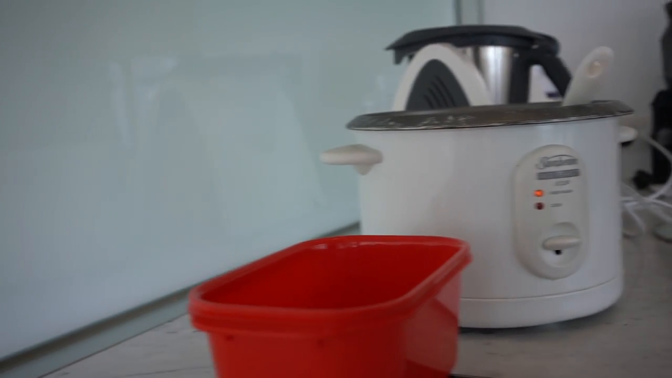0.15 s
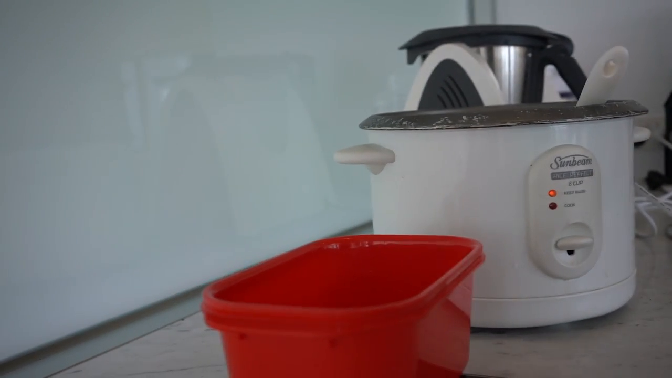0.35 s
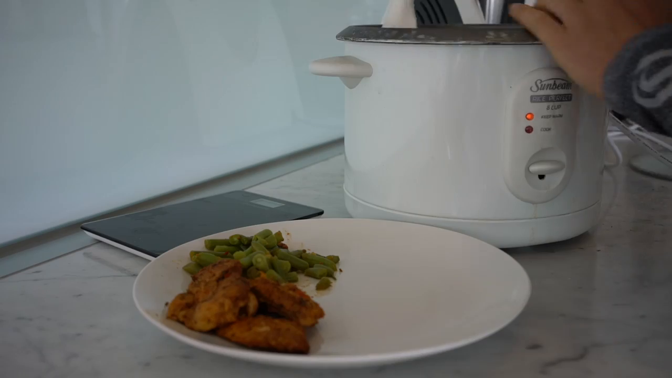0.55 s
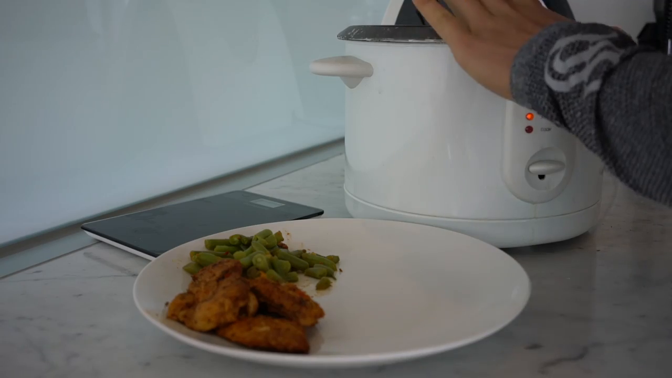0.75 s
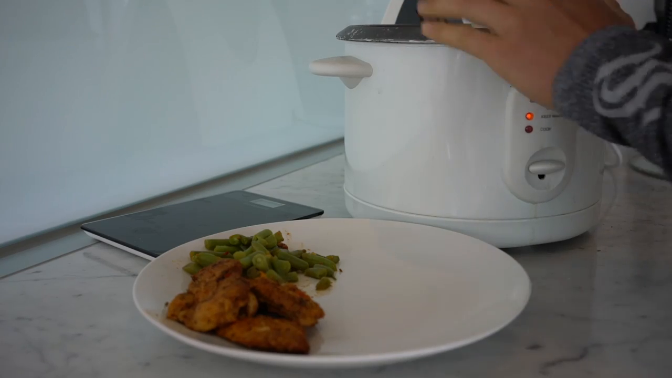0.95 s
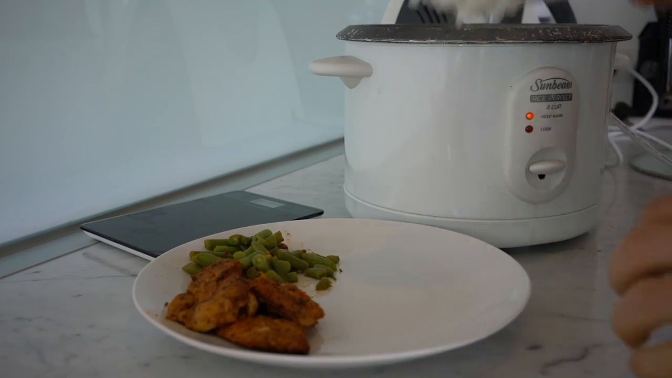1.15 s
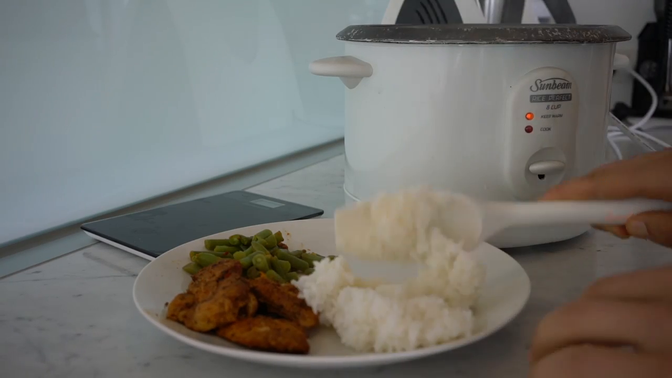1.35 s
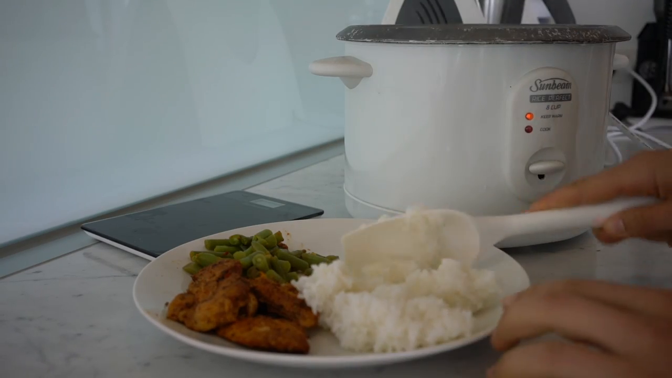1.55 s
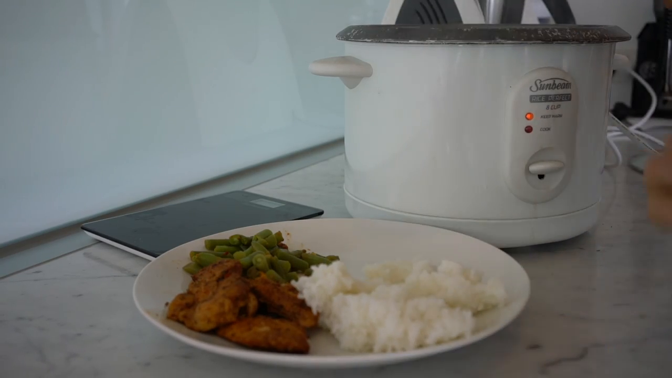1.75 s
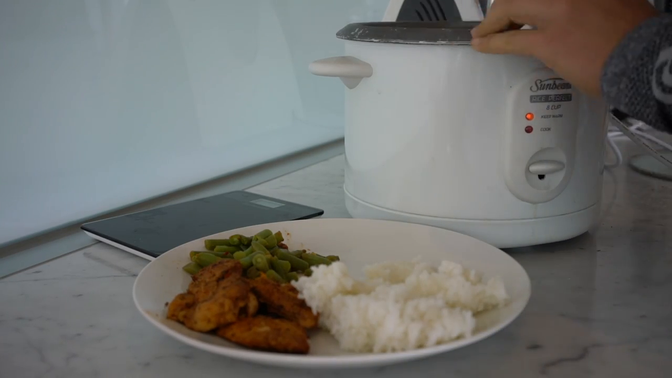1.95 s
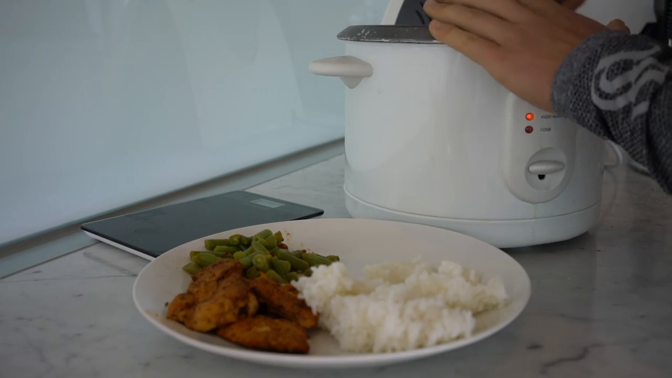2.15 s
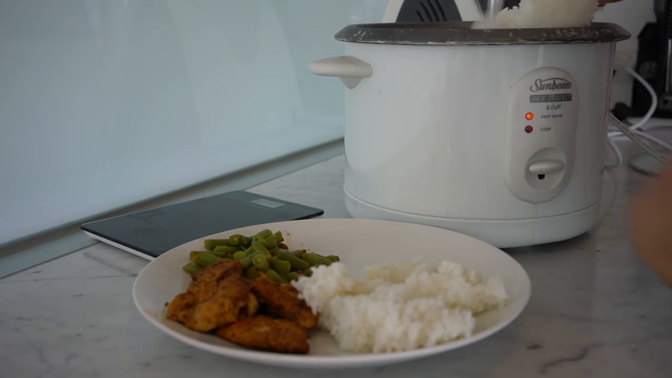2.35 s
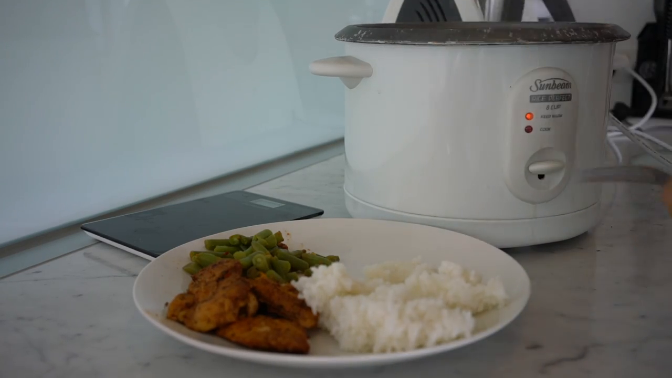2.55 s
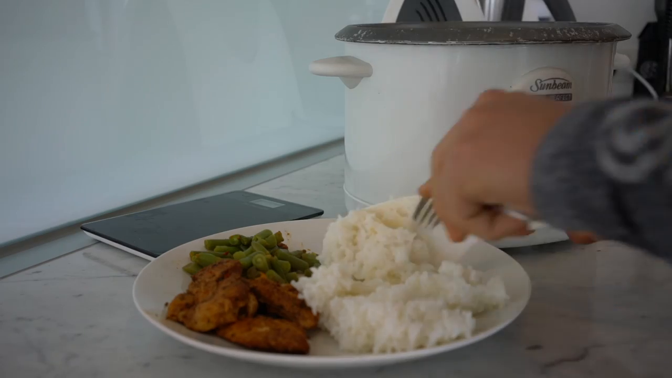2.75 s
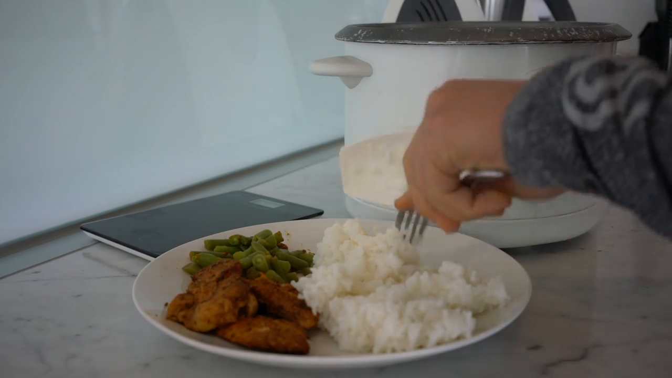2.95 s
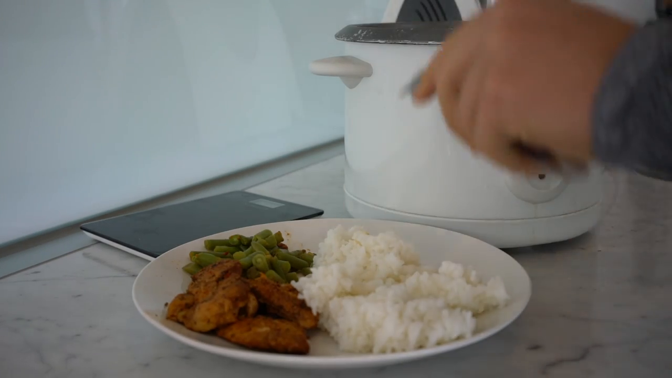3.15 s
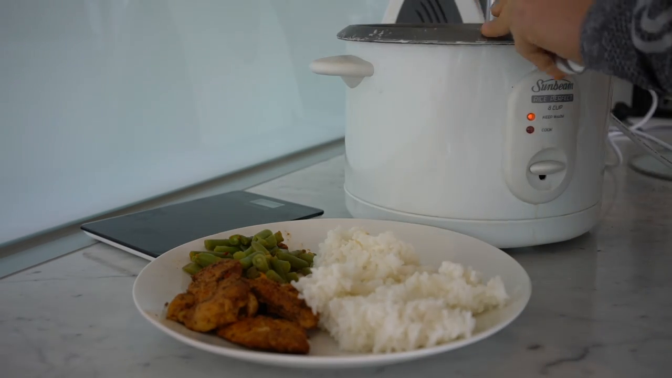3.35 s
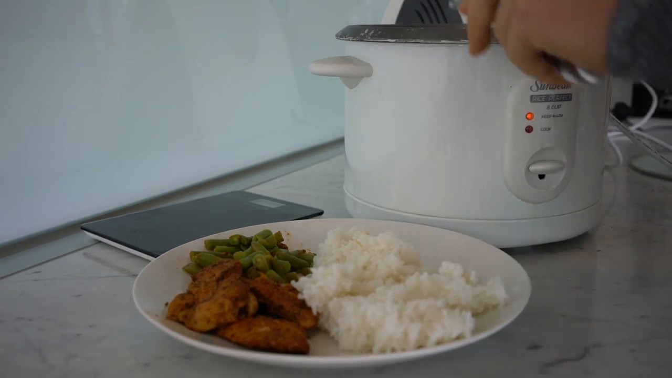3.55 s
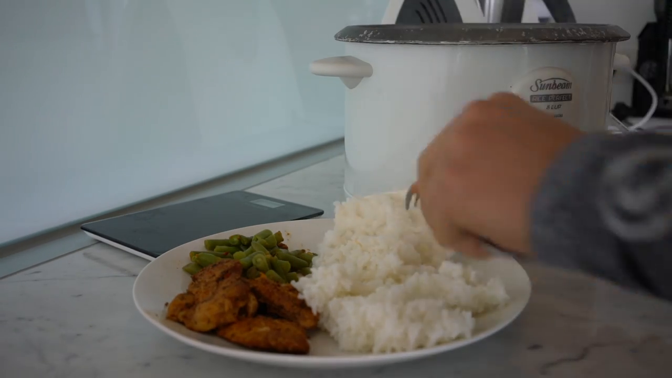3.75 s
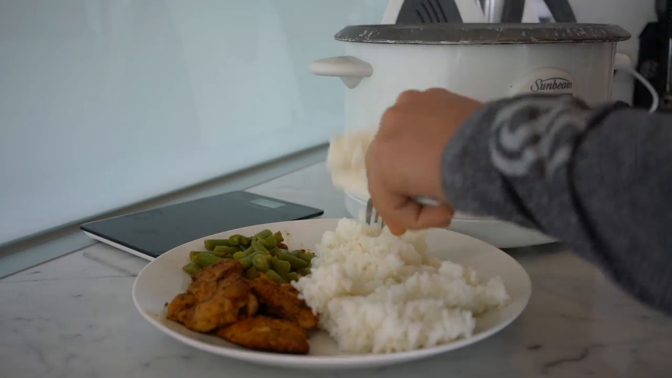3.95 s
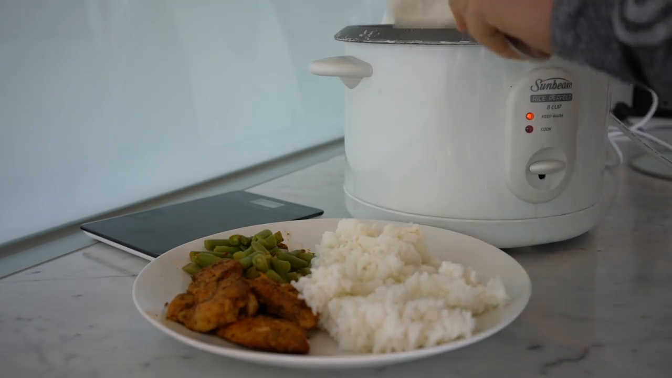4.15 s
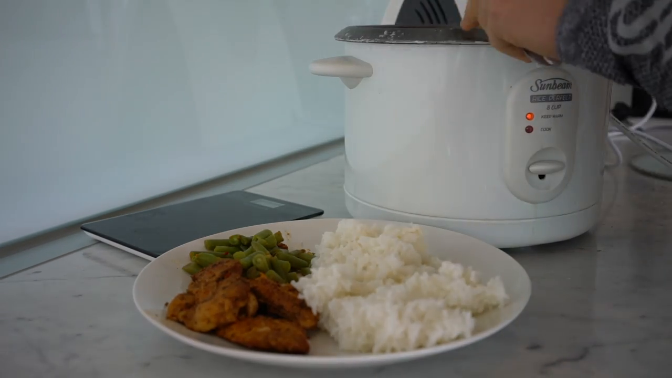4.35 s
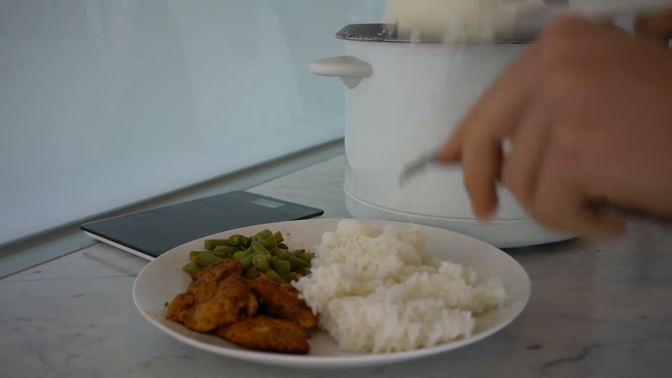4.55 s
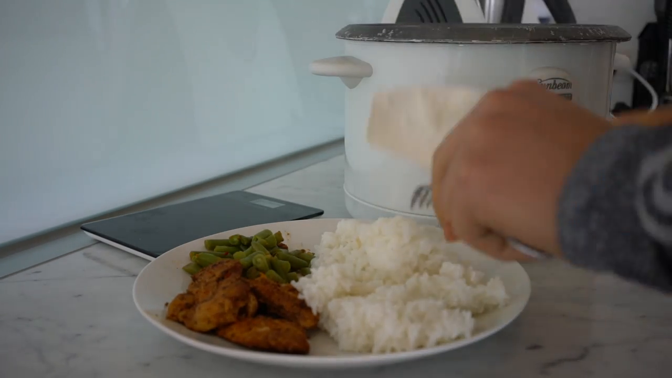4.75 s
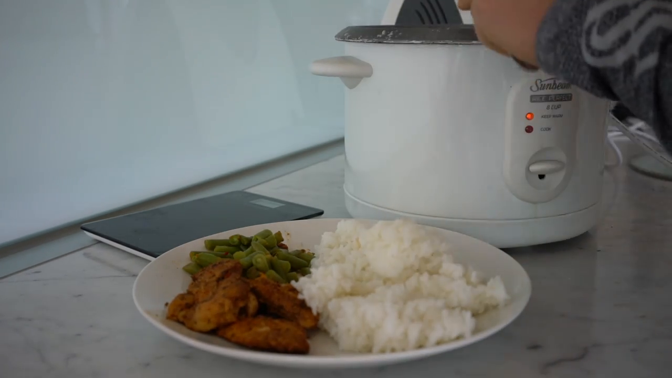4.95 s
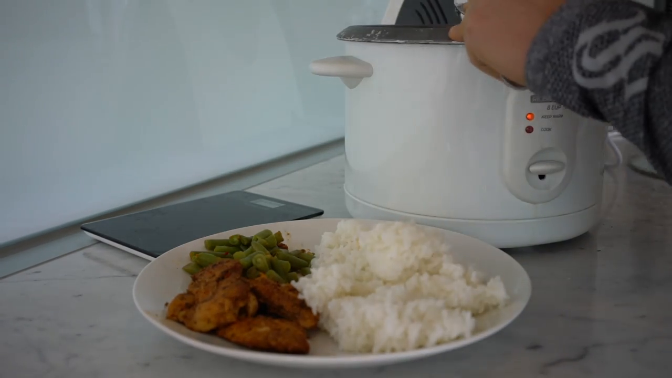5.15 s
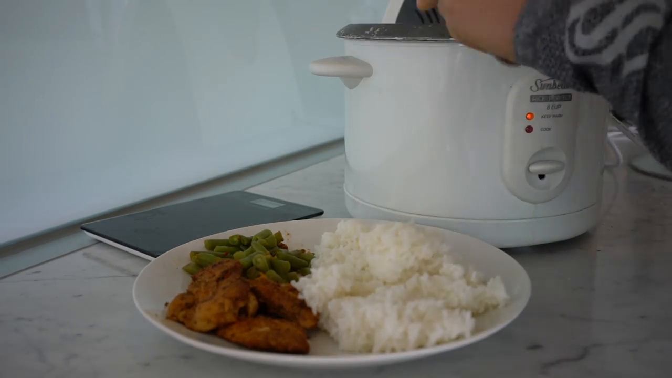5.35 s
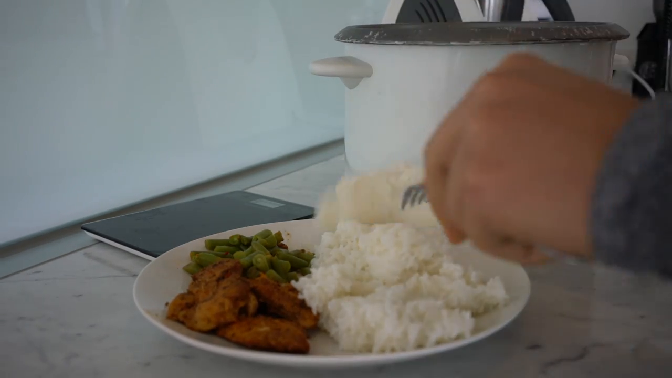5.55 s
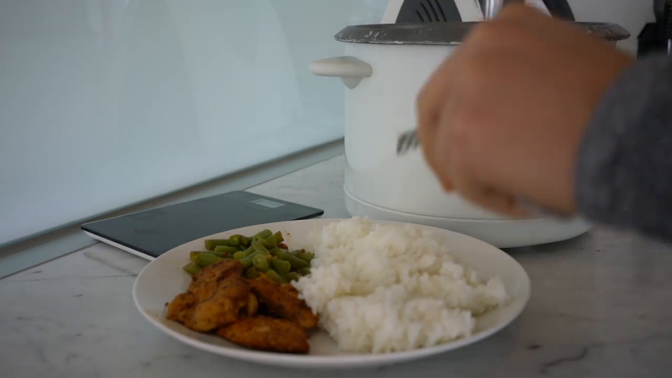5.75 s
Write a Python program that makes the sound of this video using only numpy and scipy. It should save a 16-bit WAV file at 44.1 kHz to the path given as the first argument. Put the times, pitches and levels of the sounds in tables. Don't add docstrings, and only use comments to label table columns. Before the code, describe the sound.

Low handling rumble and rattle cut off, then a spoon digs rice from a metal cooker pot with dull knocks, scrapes and plate taps.

```python
import sys
import numpy as np
from scipy import signal
from scipy.fft import rfft, irfft, next_fast_len
from scipy.io import wavfile
from scipy.ndimage import uniform_filter1d, map_coordinates

SR = 44100
rng = np.random.default_rng(int(sys.argv[2]) if len(sys.argv) > 2 else 0)


def convert_level_to_amplitude(level_db):
    exponent = np.asarray(level_db, float) / 20
    return 10 ** exponent


def materialize(psi):
    bounded = np.clip(np.atleast_2d(psi).T, -1, 1)
    quanta = np.round(bounded * 32767).astype(np.int16)
    wavfile.write(sys.argv[1], SR, quanta)


N = 255969

# time in seconds, sway frequency in Hz, sway peak in dB.
SWAY = [
    (0, 8, -16),
    (.06, 19, -17),
    (.135, 22, -13),
    (.2, 19, -20),
    (.3, 16.5, -27),
    (.39, 17, -23),
    (.45, 19, -38),
    (.51, 25, -11),
    (.585, 22, -30),
]
# frequency in Hz, level in dB per Hz.
RATTLE_SPECTRUM = [(32, -58), (55, -11), (92, -1), (135, -16), (212, -11), (258, -56), (300, -20.5),
                   (390, -52), (660, -120)]
# frequency in Hz, width in Hz, level in dB.
CABINET_MODES = [
    (505, 81, -1.5),
    (640, 83, -3),
    (800, 34, -5),
    (1460, 720, -9),
]
# time in seconds, rustle level in dB, brightness in dB.
STIR = [(0, -55.5, 3.5), (.58, -49.5, -5), (.6, -41.5, -13), (.94, -46, -2), (1.08, -40, 6),
        (1.4, -40.5, 3), (1.72, -46.5, 4.5), (2.29, -43.5, 2), (2.55, -39.5, 0.5), (3.05, -50, 5.5),
        (3.58, -48, -4), (3.66, -45.5, 6), (4.2, -51, 5.5), (4.52, -55.5, 0.5), (4.68, -50, 1),
        (4.84, -55.5, 3), (5.58, -52, 3.5), (5.8, -56.5, -1)]
# time in seconds, rumble level in dB.
LEAN = [(.6, -47), (.75, -37), (.93, -51), (1.3, -46), (1.45, -44), (1.74, -48), (1.85, -41.5), (2.37, -52),
        (2.9, -50), (3.16, -44.5), (3.4, -46.5), (4, -48.5), (4.12, -45), (4.32, -38), (4.45, -51),
        (4.72, -46), (5.18, -41), (5.4, -53)]
# frequency in Hz, level in dB per Hz.
RUMBLE_SPECTRUM = [(8.8, -36), (15, 0.5), (48, 6), (64, -3), (81, -7), (200, -12.5), (260, -15.5),
                   (440, -120)]
HUM_SPECTRUM = [(88, -10), (150, -2.5), (218, -9), (257, -9), (284, -10.5), (552, -10), (1020, -12.5),
                (1710, -16.5), (3000, -25.5), (3900, -27), (6600, -120)]
RUSTLE_SPECTRUM = [(410, -21), (700, 8), (956, -4.5), (1190, 9), (1360, -1), (1780, 8.5), (1900, 5.5),
                   (2660, 7), (9200, 0.5), (10000, -4.5), (13700, -6.5), (15600, -11.5)]
# start in seconds, peak in dB, pitch in Hz, t60 in seconds.
JIGGLES = [
    (0.016, -37, 204, 0.074),
    (0.074, -41, 1700, .1),
    (.28, -38, 610, 0.052),
    (.35, -38, 800, .09),
    (.42, -37.5, 221, 0.093),
    (.53, -32, 211, .12),
]
# start in seconds, peak in dB, pitch in Hz.
GLINTS = [(.5869, -36, 11000), (1.2245, -28, 11000), (1.2335, -31, 11000), (1.28, -39, 10000),
          (1.327, -32, 9000), (1.43, -36, 13000), (1.631, -23, 12500), (1.6769, -22, 12500),
          (1.9483, -21, 11000), (2.0735, -30, 11000), (2.8517, -32, 12000), (2.861, -31, 11000),
          (3.0702, -31, 11500), (3.1126, -31, 12000), (3.2503, -40, 12000), (3.259, -39, 12000),
          (3.3376, -39, 11000), (3.3516, -39, 11000), (3.4883, -42, 11000), (3.614, -35, 11000),
          (4.277, -43, 11000), (4.4521, -49, 11000), (4.7195, -38, 9000), (4.805, -47, 11000),
          (4.511, -44, 11500), (4.595, -44, 14000), (4.714, -32, 6500), (4.729, -41, 9000),
          (4.8562, -41, 12000), (5.0133, -31, 11000), (5.0198, -32, 11000), (5.1171, -23, 9000),
          (5.1919, -36.5, 11000), (5.3096, -33, 8900), (5.415, -42, 9000), (5.6469, -46, 13000),
          (5.743, -38, 8200), (5.7511, -40, 13500)]
# start in seconds, peak in dB, pitch in Hz.
SNAPS = [(0.5878, -36, 2500), (1.2545, -25, 2200), (1.316, -27, 8700), (1.403, -31, 7000),
         (1.3264, -38, 2720), (1.629, -28.5, 4050), (1.6773, -45, 2680), (1.6944, -34, 4260),
         (2.763, -27.5, 5040), (2.8538, -33, 4390), (2.8616, -35, 2690), (2.9224, -35, 3210),
         (2.9746, -38, 8620), (3.0126, -34.5, 2930), (3.0696, -35, 8800), (3.112, -36, 3780),
         (3.253, -35, 8440), (3.2585, -35.5, 2600), (3.6144, -29, 2730), (3.8347, -33, 8600),
         (3.861, -30, 4700), (3.927, -34, 3470), (4.276, -29, 2840), (4.773, -46, 3710),
         (4.8054, -53, 6010), (4.858, -35, 8500), (4.8784, -34, 5530), (5.1178, -31, 2800),
         (5.3093, -33.5, 8500), (5.4864, -52, 2720)]
# frequency in Hz, width in Hz, level in dB.
POT_MODES = [(126, 125, -8), (250, 141, -1.5), (307, 36, 3.5), (350, 70, -2.5), (460, 23, 1.5),
             (679, 202, -3.5), (770, 120, -1), (955.6, 36, -10.5), (1145, 107, -8.5), (1672, 93, -12.5),
             (2006, 210, -14.5), (2600, 3600, -34)]
EDGE_MODES = [(2880, 1460, -4), (4220, 21, 4), (4230, 1100, -8.5), (8600, 2000, -2), (13000, 2300, -7)]
# start in seconds, peak in dB, favoured pitch in Hz.
RAPS = [(.722, -14, 274), (.788, -19.5, 345), (.829, -24.5, 316), (.876, -19, 690), (.898, -19.5, 920),
        (1.251, -31.5, 1210), (1.999, -12.5, 330), (2.409, -34, 278), (2.513, -26.5, 1366),
        (3.511, -18.5, 1756), (2.042, -21, 1770), (4.451, -17.5, 610), (1.06, -27, 1800)]
KNOCKS = [(.993, -30.5, 550), (1.056, -34, 573), (1.93, -26, 770), (1.967, -9.5, 280), (2.037, -15, 590),
          (2.183, -25, 295), (2.362, -14, 276), (2.374, -23, 400), (2.395, -35, 274), (2.57, -29, 456),
          (3.321, -21, 325), (3.338, -10.5, 300), (3.41, -13.5, 640), (3.644, -19.5, 228),
          (4.277, -11, 282), (4.291, -12, 455), (4.314, -13, 343), (4.377, -20.5, 383), (4.396, -20.5, 344),
          (4.444, -13.5, 440), (4.488, -38, 307), (5.037, -15.5, 287), (5.089, -17, 435), (5.117, -15, 604),
          (5.188, -14, 395), (5.367, -19.5, 477), (2.328, -30, 600), (5.004, -25, 405), (3.455, -30, 310),
          (3.555, -33, 470)]
NUDGES = [(.733, -17.5, 404), (1.942, -12, 542), (2.071, -16, 620), (2.261, -27, 665), (2.309, -30, 477),
          (2.339, -15.5, 624), (3.432, -20, 313), (3.544, -19, 510), (3.619, -14.5, 329), (5.016, -13, 430),
          (5.223, -33, 262), (5.301, -27.5, 485), (5.447, -34.5, 503), (5.484, -31.5, 685),
          (5.495, -33, 297), (5.32, -34, 620)]
DRAGS = [(.616, -17.5, 345), (.66, -24, 390), (.69, -22.5, 514), (.81, -25, 497), (1.984, -14, 348),
         (2.081, -11, 400), (2.109, -16, 250), (2.149, -21, 450), (3.352, -14, 310), (3.487, -20, 384),
         (3.606, -20, 470), (4.359, -25.5, 307), (5.01, -18.5, 250), (5.06, -20.5, 250), (5.133, -18, 279),
         (5.389, -30, 450), (5.235, -29.5, 394)]
# start in seconds, peak in dB, favoured pitch in Hz.
BLOWS = [(.6195, -27, 336), (.7225, -19.5, 298), (.7365, -21, 423), (0.788, -25, 334), (1.0619, -22, 630),
         (1.9455, -14.5, 505), (1.973, -12, 330), (1.981, -13, 312), (2.0855, -15, 365), (2.1025, -14, 400),
         (2.116, -13.5, 300), (2.345, -21, 665), (2.3635, -20, 294), (3.336, -9.5, 320), (3.37, -14.5, 302),
         (3.4875, -17.5, 404), (3.6185, -16, 408), (4.2955, -8, 350), (4.3065, -14, 332),
         (4.4545, -14.5, 560), (5.0205, -20, 348), (5.0295, -13.5, 340), (5.043, -16, 480),
         (5.0935, -11, 476), (5.132, -11, 390), (5.139, -11, 270), (5.1915, -18, 436), (5.303, -24.5, 460),
         (5.372, -28, 474), (5.38, -23, 450), (5.446, -32, 463), (3.432, -21.5, 310), (3.352, -11, 292),
         (5.4885, -26, 290)]
# start in seconds, peak in dB.
FLICKS = [(.6286, -33), (.6746, -19), (.699, -17), (.7187, -18), (.7879, -16.5), (.8794, -17),
          (1.946, -20.5), (1.9594, -14.5), (2.0994, -20), (2.2308, -28), (3.3497, -18), (3.5056, -33),
          (3.6494, -43), (1.222, -26.5), (4.4492, -31), (4.7282, -29), (4.8234, -58), (5.043, -24.5),
          (5.1164, -20.5), (5.1893, -21.5)]
SWEEPS = [(.61, -35), (.6507, -25), (.69, -32), (.89, -34), (.76, -18), (.735, -26.5), (.8183, -20),
          (.8508, -19.5), (2.0765, -21.5), (2.1872, -27), (3.3357, -21.5), (3.3697, -24.5), (3.491, -33.5),
          (3.6127, -28.5), (4.1919, -33.5), (4.2768, -26.5), (4.3075, -26.5), (4.7156, -41), (5.019, -20.5),
          (5.135, -28.5), (5.6384, -40.5)]
# start in seconds, peak in dB, brightness in dB, singing pitch in Hz, t60 in seconds.
SQUEAKS = [(1.578, -30, -33, 4060, 0.02), (0.899, -19.5, -40, 3190, 0.039),
           (1.989, -22.5, -22, 4040, 0.097), (2.0025, -14.5, -19, 4220, 0.013),
           (2.0405, -22, -16.5, 4220, 0.024), (2.1195, -26.5, -30, 2960, 0.066),
           (2.5137, -27.5, -45, 5260, 0.06), (2.7567, -30.5, -10, 4100, 0.066),
           (3.4095, -17.5, -17, 4120, 0.059), (3.5427, -36, -19, 4930, 0.046),
           (3.901, -30, -14.5, 3320, 0.051), (4.36, -23, -35, 4220, 0.052),
           (4.373, -27.5, -22, 4260, 0.018), (4.391, -39, -15, 2850, 0.074), (5.088, -36, -18, 2520, 0.099)]
# start in seconds, peak in dB, thud pitch in Hz, ring level in dB, favoured mode in Hz.
TAPS = [
    (1.492, -27, 158, -12, 1575),
    (1.5347, -16, 129, -7.5, 1575),
    (1.546, -20, 101, -7, 1575),
    (1.5733, -38.5, 150, 8, 2320),
    (1.5806, -17, 158, -11, 4250),
    (1.589, -17.5, 113, -15, 855),
    (1.6257, -16, 148, -10.5, 1200),
    (1.67, -13, 118.5, -16.5, 1200),
]
# frequency in Hz, width in Hz, level in dB.
PLATE_MODES = [
    (370, 92, 11),
    (855, 250, 4),
    (1575, 150, 4.5),
    (2320, 120, 0),
    (2820, 2200, -8.5),
    (4250, 61, -1),
]
# start in seconds, peak in dB.
TICKS = [
    (2.513, -29),
    (2.8963, -19),
    (5.357, -24),
    (5.3754, -27.5),
    (5.643, -33.5),
    (5.388, -39),
    (4.8195, -42),
]
# frequency in Hz, level in dB, t60 in seconds.
FORK_MODES = [
    [(1464, -10, 0.11), (2600, -7, 0.042), (5260, -7, 0.1), (8970, -7, 0.1), (11600, -10, .06),
     (12600, -10, .07), (14300, -14, .06)],
    [(427, -8, 0.069), (1760, 9.5, 0.011), (3096, 8, 0.035), (3214, -3, 0.056), (4100, -4, 0.038),
     (6400, -2, 0.043), (8600, 1, 0.03), (11900, -2, 0.026), (13300, -12, .03)],
    [(1135, 6.5, 0.1), (2280, 2, 0.059), (3320, 3, 0.032), (5300, -14, 0.11)],
    [(1120, -3, 0.078), (1690, -4, 0.12), (2110, 9, 0.028)],
    [(974, -15, 0.12), (1540, 1, 0.018), (2270, -11, .04)],
    [(1120, 1, 0.062), (1740, 1, 0.085), (2140, -8, 0.073)],
    [(4850, -3, .05), (6000, 0, .06), (8200, -3, .04), (9900, -1, .06), (11800, -8, .04), (13600, -2, .05)],
]
# frequency in Hz, t60 in seconds.
KITCHEN_T60 = [
    (200, 0.38),
    (2000, 0.19),
    (10000, 0.024),
]
# frequency in Hz, width in Hz, level in dB.
PORT_MODES = [
    (8700, 900, -15),
]


def unit(x):
    return x / np.sqrt(np.mean(x ** 2) + 1e-20)


def along(points, hz):
    f, v = np.transpose(points)
    return np.interp(np.log(hz + 1), np.log(f + 1), v)


def curves(rows):
    s, *columns = np.transpose(rows)
    return [np.interp(np.arange(N) / SR, s, column) for column in columns]


def wobble(rate):
    knots = rng.standard_normal(int(N * rate / SR) + 40)
    return map_coordinates(knots, [np.arange(N) * rate / SR])


def filtered(x, response):
    m = next_fast_len(2 * len(x))
    return irfft(rfft(x, m) * response(np.fft.rfftfreq(m, 1 / SR)), m)[:len(x)]


def body(modes, gain_db=lambda hz: 0):
    def response(f):
        total = 0
        for k, (hz, width, db) in enumerate(modes):
            damping = 1j * f * width
            total = total + (-1) ** k * convert_level_to_amplitude(db + gain_db(hz)) * damping / (hz * hz - f * f + damping)
        return total
    return response


def rush(spectrum, patchy_db):
    z = signal.stft(rng.standard_normal(N), nperseg=512)[2]
    patches = uniform_filter1d(rng.standard_normal(z.shape), 6, axis=0)
    patches = uniform_filter1d(patches, 12, axis=1)
    x = signal.istft(z * convert_level_to_amplitude(patchy_db * unit(patches)), nperseg=512)[1][:N]
    return unit(filtered(x, lambda hz: convert_level_to_amplitude(along(spectrum, hz))))


def stroke(rise, t60, grit_db):
    t = np.arange(SR // 5) / SR
    grit = convert_level_to_amplitude(grit_db * unit(uniform_filter1d(rng.standard_normal(len(t)), size=60)))
    swell = np.sin(np.pi / 2 * np.clip(t / max(rise, .0003), 0, 1)) ** 2
    fall = convert_level_to_amplitude(-60 * (np.maximum(t - rise, 0) / max(0.66 * t60, .004)) ** 1.6)
    return swell * fall * grit * rng.standard_normal(len(t))


def add(track, s, x, db):
    track[round(s * SR):][:len(x)] += convert_level_to_amplitude(db) * x / np.abs(x).max()


def ring(modes, t, attack):
    total = 0
    for hz, db, t60 in modes:
        decay = convert_level_to_amplitude(db + rng.normal(0, 1) - 60 * t / t60)
        total = total + decay * np.sin(2 * np.pi * hz * t)
    return total * (1 - np.exp(-t / attack))


def shake():
    t = np.arange(N) / SR
    hz, sway_db = curves(SWAY)
    phase = 2 * np.pi * np.cumsum(hz) / SR + 1.3
    sway = convert_level_to_amplitude(sway_db) * (np.sin(phase) + .18 * np.sin(3 * phase))
    dip_db = 7.5 * np.exp(-((t - .36) / 0.096) ** 2)
    rattle_db = sway_db - 16.5 - dip_db
    rattle = convert_level_to_amplitude(rattle_db - 1.5 + 0.35 * wobble(35.0)) * rush(RATTLE_SPECTRUM, patchy_db=6.5)
    hum_db = -51.5 + 10.5 * np.exp(-t / 0.22) + 2.9 * wobble(18.7)
    hum = convert_level_to_amplitude(hum_db) * unit(filtered(rng.standard_normal(N), body(CABINET_MODES)))
    scene_change_s = .587
    return (sway + rattle + hum) * (np.arange(N) < scene_change_s * SR)


def busy(x):
    linger_s = 0.029
    memory = np.exp(-np.arange(SR // 2) / SR / linger_s)
    return np.sqrt(np.abs(signal.fftconvolve(x ** 2, memory / memory.sum())[:N]))


def air(bumps, slides):
    crunch_db, boom_db = -12.5, -21.5
    hum_db, hum_follows = -50, 0.47
    rustle_db, bright_db = curves(STIR)
    steady_hum = convert_level_to_amplitude(hum_db + hum_follows * (rustle_db - rustle_db.mean()))
    hum_level = np.hypot(steady_hum, convert_level_to_amplitude(boom_db) * busy(bumps))
    rustle = rush(RUSTLE_SPECTRUM, patchy_db=.4)
    treble = filtered(rustle, lambda hz: 1 / (1 + (7000 / (hz + 1)) ** 4))
    flutter = convert_level_to_amplitude(.6 * wobble(20))
    rustle_level = np.hypot(convert_level_to_amplitude(rustle_db), convert_level_to_amplitude(crunch_db) * busy(slides)) * flutter
    rustle = rustle_level * (rustle + (convert_level_to_amplitude(bright_db) - 1) * treble)
    rumble = convert_level_to_amplitude(curves(LEAN)[0] + 1.3 * wobble(4.3)) * rush(RUMBLE_SPECTRUM, patchy_db=0.0)
    hum = hum_level * convert_level_to_amplitude(1.7 * wobble(20.73)) * rush(HUM_SPECTRUM, patchy_db=0.85)
    return rumble + hum + rustle


def jiggles():
    out = np.zeros(N + SR)
    for s, db, hz, t60 in JIGGLES:
        mode = body([(hz, .3 * hz, 0)])
        add(out, s, filtered(stroke(0.011, t60, grit_db=2), lambda f: mode(f) ** 2), db)
    return out[:N]


def glints():
    out = np.zeros(N + SR)
    for s, db, hz in GLINTS:
        mode = body([(hz, .6 * hz, 0)])
        click = stroke(0.00046, 0.0051, grit_db=10)[:SR // 20]
        add(out, s, filtered(click, lambda f: mode(f) ** 2), db)
    return out[:N]


def snaps():
    out = np.zeros(N + SR)
    for s, db, hz in SNAPS:
        mode = body([(hz, 0.9 * hz, 0)])
        click = stroke(0.00084, 0.024, grit_db=0.5)
        add(out, s, filtered(click, lambda f: mode(f) ** 2 / (1 + 1j * f / 7000) ** 2), db)
    return out[:N]


def bump(hz, hard_db, t60, rise):
    def near(c):
        return 6 * np.exp(-(np.log2(c / hz) / 0.25) ** 2) + (hard_db + 13.5) * 0.73 * (c > 900)

    held = 1 + 0.018 * rng.normal()
    pot_wall, spot = body(POT_MODES, near), body([(hz, 0.13 * hz, 6)])
    return filtered(stroke(rise, t60, grit_db=4.5), lambda f: pot_wall(f * held) + spot(f))


def pot():
    out = np.zeros(N + SR)
    # contacts, hardness in dB, t60 in seconds, rise in seconds
    for rows, hard_db, t60, rise in [(RAPS, -1.8, 0.058, .008), (KNOCKS, -12, 0.064, .0135),
                                     (NUDGES, -24, 0.047, .0135), (DRAGS, -13, 0.17, .0135)]:
        for s, db, hz in rows:
            add(out, s - .7 * rise, bump(hz, hard_db, t60, rise), db)
    push_s = 0.0011
    push = np.sin(np.pi * np.clip(np.arange(SR // 8) / SR / push_s, 0, 1))
    wall = body(POT_MODES)
    for s, db, hz in BLOWS:
        spot = body([(hz, 0.23 * hz, 3)])
        add(out, s, filtered(push, lambda f: wall(f) + spot(f)), db)
    floor_hz = 118
    return filtered(out[:N], lambda f: (1j * f / (floor_hz + 1j * f)) ** 2)


def scrapes():
    out = np.zeros(N + SR)
    rise, light_db = .013, -12.5
    light = []
    for rows, t60 in [(FLICKS, 0.077), (SWEEPS, 0.19)]:
        for s, db in rows:
            catch_hz = 3400 * np.exp(0.384 * rng.normal())
            light.append((s, db, light_db, catch_hz, t60))
    for s, db, bright_db, hz, t60 in light + SQUEAKS:
        edge = body(EDGE_MODES, lambda c: 1.5 * (bright_db + 11) * np.log2(c / 5000))
        sing = body([(hz, 140, np.clip(-2.8 * (bright_db + 11.5), -6, 16))])
        force = stroke(rise, t60, grit_db=2)
        add(out, s - .6 * rise, filtered(force, lambda f: edge(f) + sing(f)), db)
    return out[:N]


def plate():
    out, t = np.zeros(N + SR), np.arange(SR // 6) / SR
    thud_rise, thud_t60, jar_t60 = 0.0037, 0.037, 0.027
    for s, db, hz, ring_db, spot_hz in TAPS:
        envelope = convert_level_to_amplitude(-60 * t / thud_t60) * (1 - np.exp(-(t / thud_rise) ** 2))
        add(out, s, np.sin(2 * np.pi * hz * t) * envelope, db)
        china = body(PLATE_MODES, lambda c: 7 * np.exp(-(np.log2(c / spot_hz) / 0.36) ** 2))
        add(out, s, filtered(stroke(.0004, jar_t60, grit_db=2), china), db + ring_db + 7.5)
    return out[:N]


def fork():
    out, t = np.zeros(N + SR), np.arange(SR // 5) / SR
    for (s, db), modes in zip(TICKS, FORK_MODES):
        contact = 0.2 * convert_level_to_amplitude(-60 * t / 0.0066) * rng.standard_normal(len(t))
        add(out, s, ring(modes, t, 0.0015) + contact, db)
    return out[:N]


def kitchen(x):
    hz, t, z = signal.stft(rng.standard_normal(SR // 2), SR, nperseg=256)
    decay = convert_level_to_amplitude(-60 * t / along(KITCHEN_T60, hz)[:, None])
    tail = signal.istft(z * decay, SR, nperseg=256)[1]
    delayed = np.pad(x, (200, 0))
    return signal.fftconvolve(delayed, tail / np.linalg.norm(tail))[:N]


def scene():
    bumps, slides = pot(), scrapes()
    near = jiggles() + glints() + snaps() + bumps + slides + plate() + fork()
    return (near + convert_level_to_amplitude(-18.5) * kitchen(near) + air(bumps, slides) + shake())[None]


def low_pass(x):
    return signal.sosfilt(signal.butter(12, 15710, fs=SR, output="sos"), x)


def record(dry):
    hiss = convert_level_to_amplitude(-67) * rng.standard_normal(N)
    port, top_hz = body(PORT_MODES), 15800
    limited = filtered(dry[0] + hiss, lambda hz: (1 + port(hz)) * (hz < top_hz))
    return low_pass(limited[None])


dry = scene()
out = record(dry)
materialize(out)
```